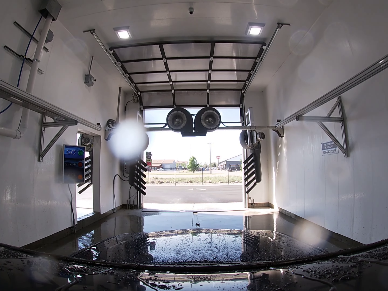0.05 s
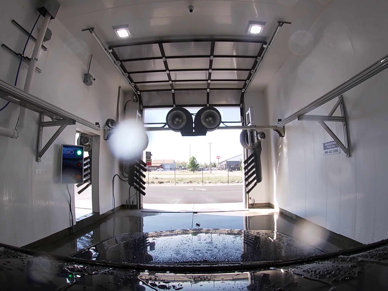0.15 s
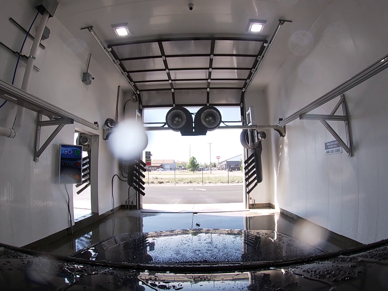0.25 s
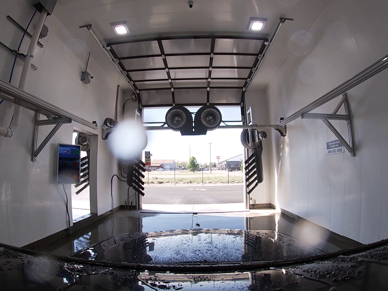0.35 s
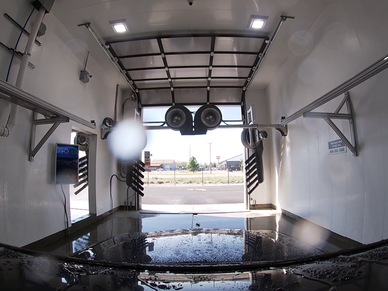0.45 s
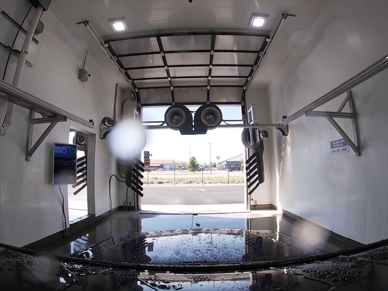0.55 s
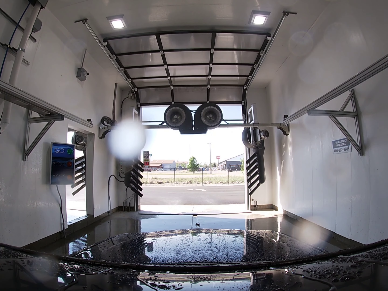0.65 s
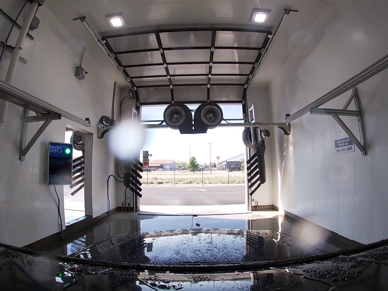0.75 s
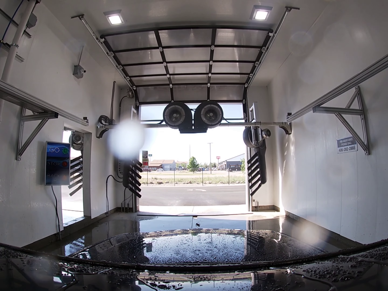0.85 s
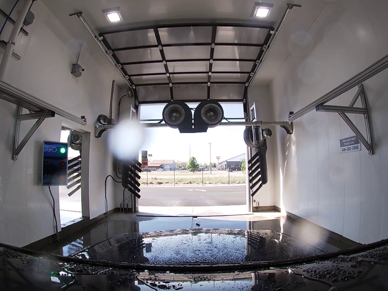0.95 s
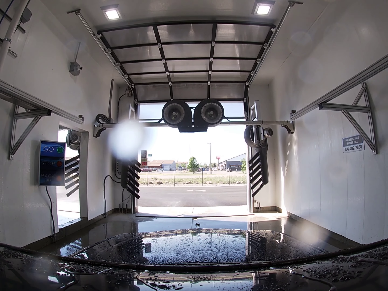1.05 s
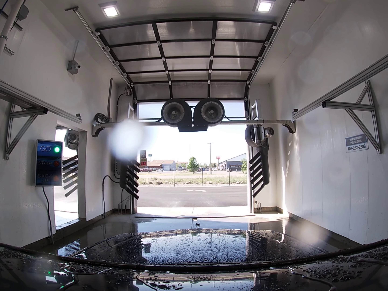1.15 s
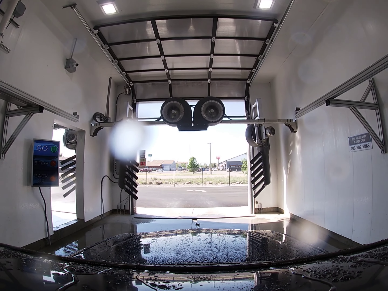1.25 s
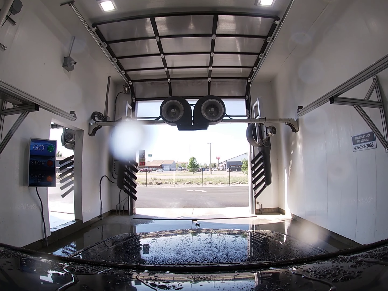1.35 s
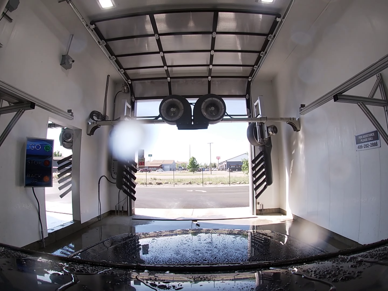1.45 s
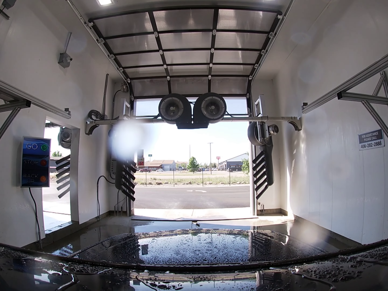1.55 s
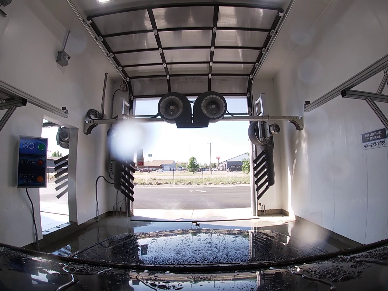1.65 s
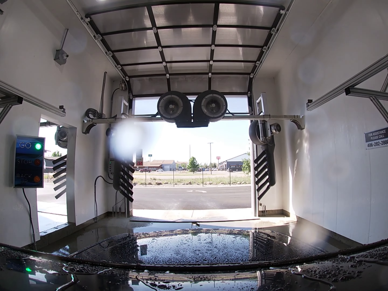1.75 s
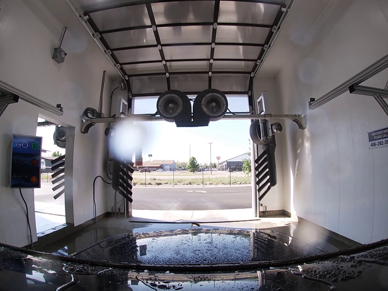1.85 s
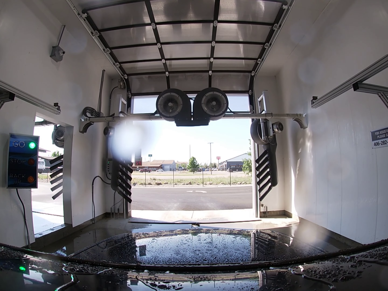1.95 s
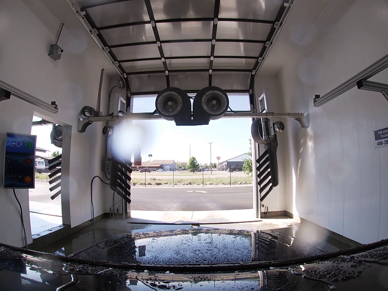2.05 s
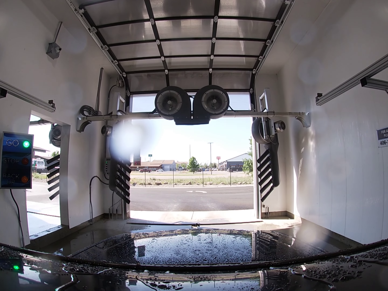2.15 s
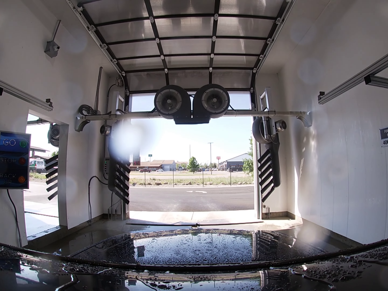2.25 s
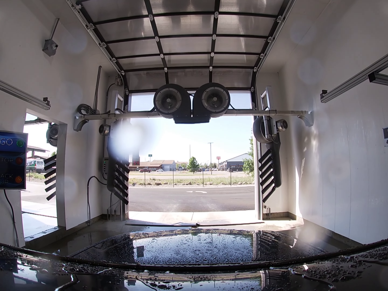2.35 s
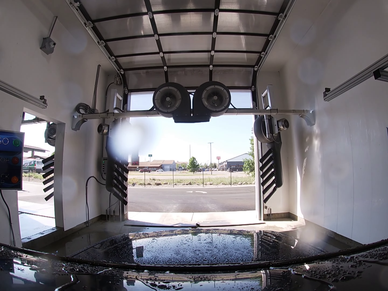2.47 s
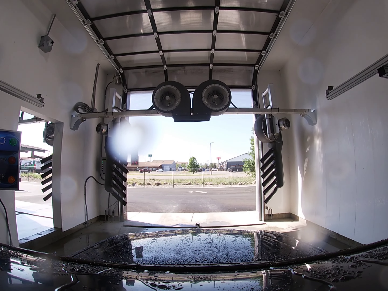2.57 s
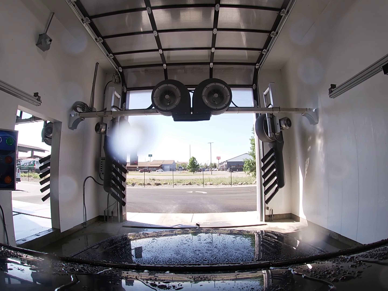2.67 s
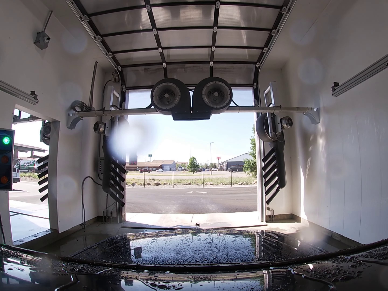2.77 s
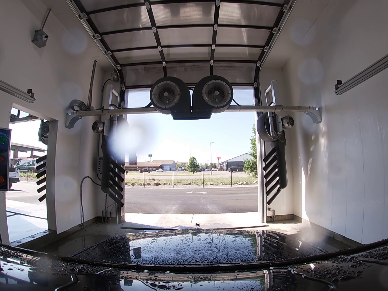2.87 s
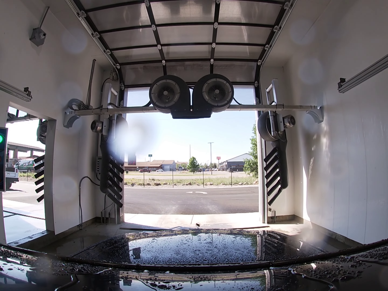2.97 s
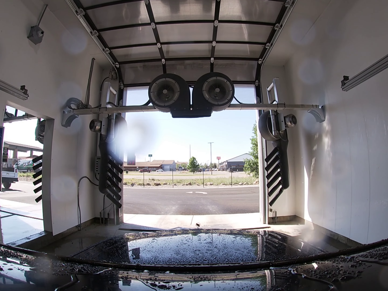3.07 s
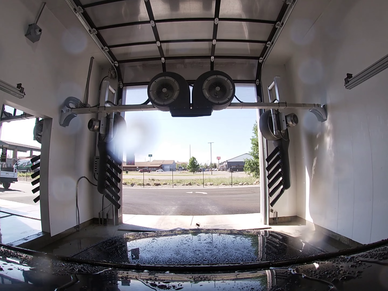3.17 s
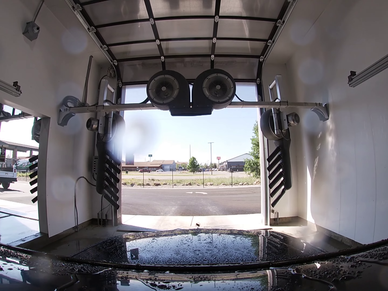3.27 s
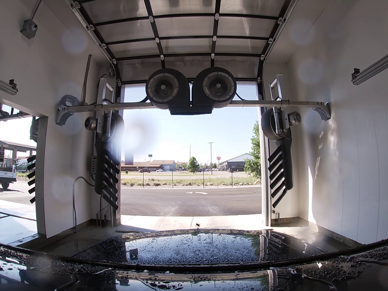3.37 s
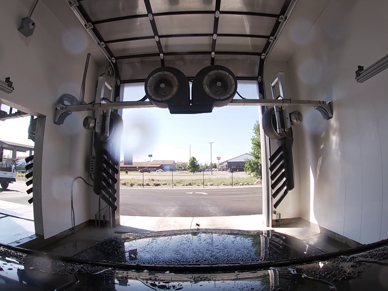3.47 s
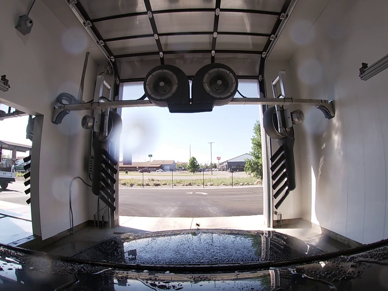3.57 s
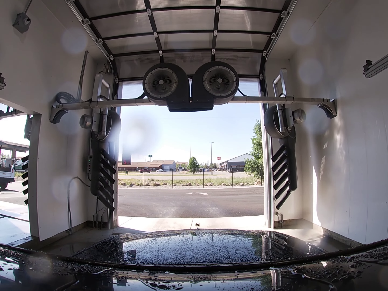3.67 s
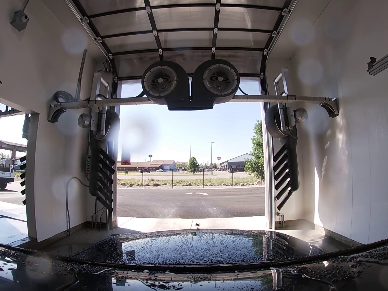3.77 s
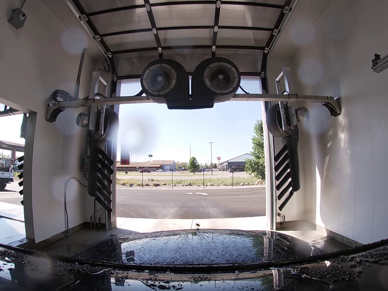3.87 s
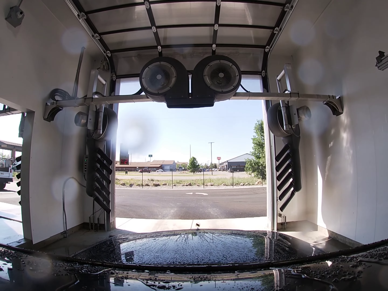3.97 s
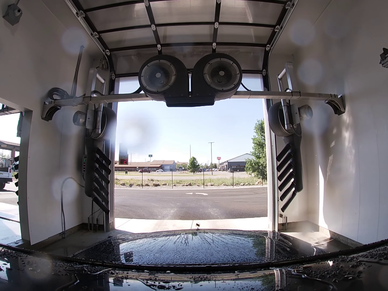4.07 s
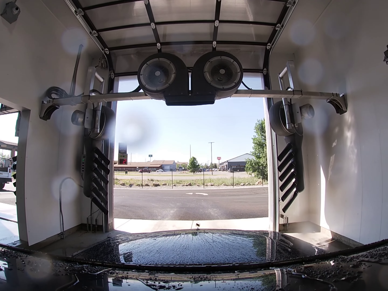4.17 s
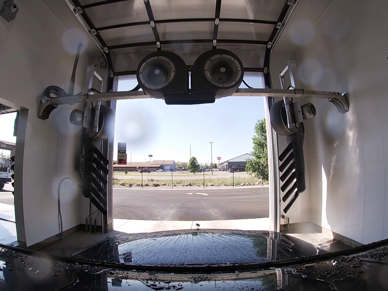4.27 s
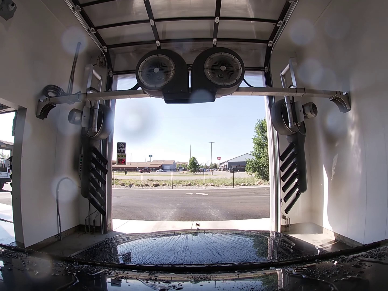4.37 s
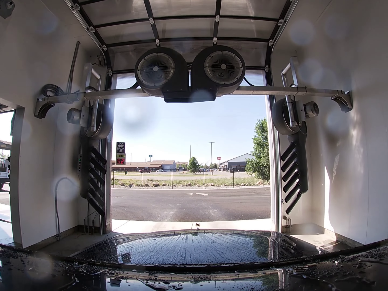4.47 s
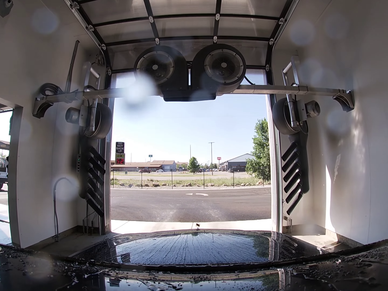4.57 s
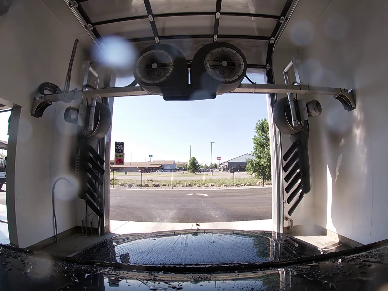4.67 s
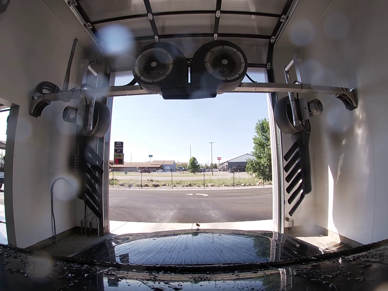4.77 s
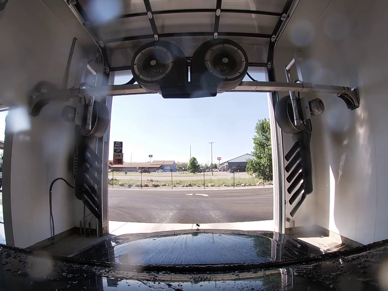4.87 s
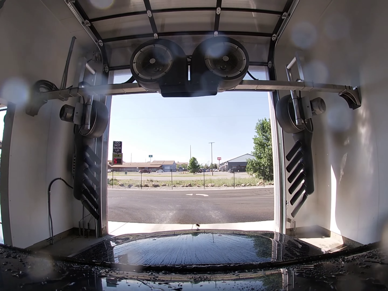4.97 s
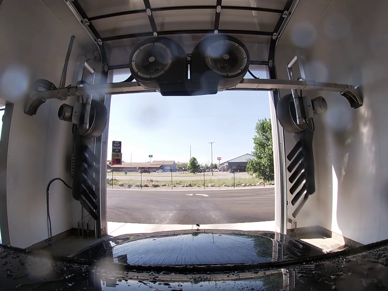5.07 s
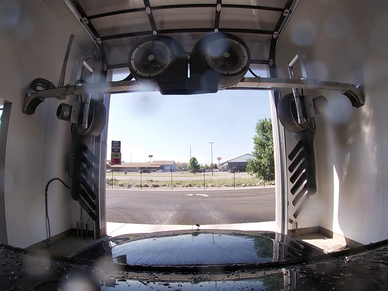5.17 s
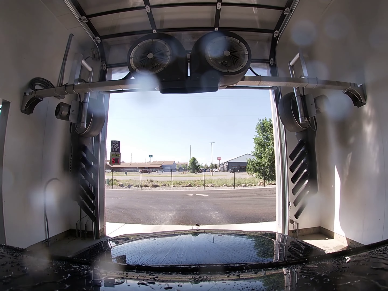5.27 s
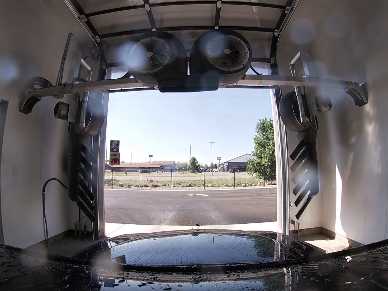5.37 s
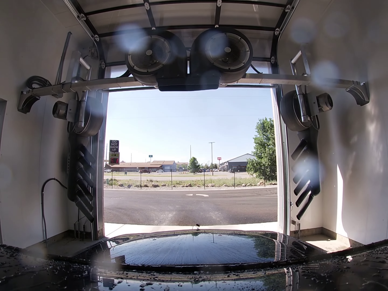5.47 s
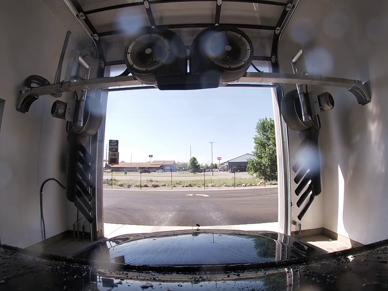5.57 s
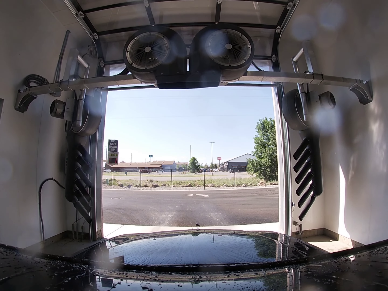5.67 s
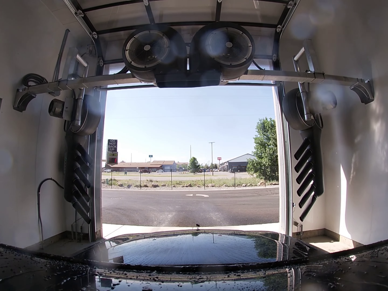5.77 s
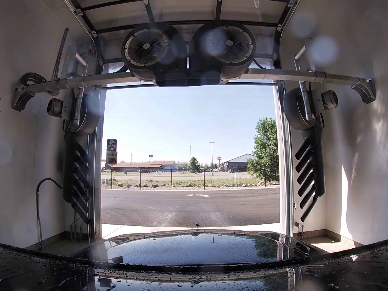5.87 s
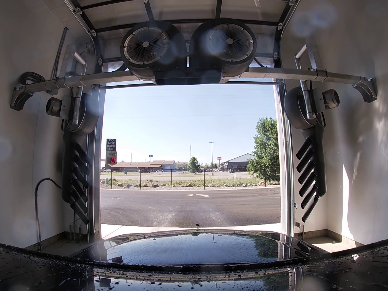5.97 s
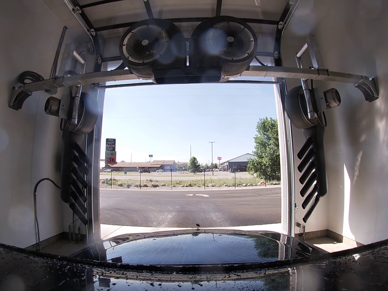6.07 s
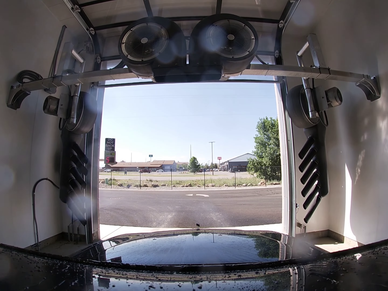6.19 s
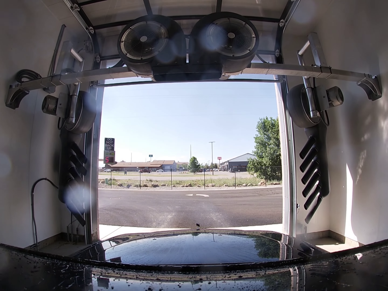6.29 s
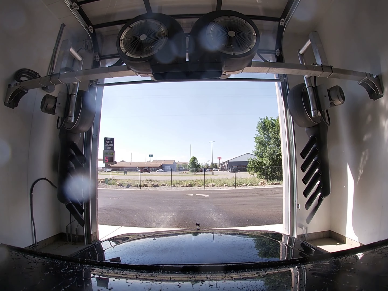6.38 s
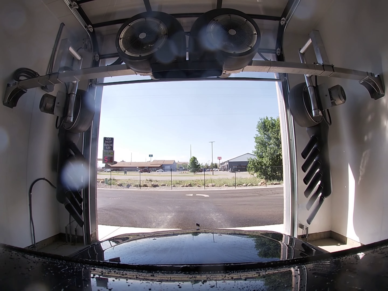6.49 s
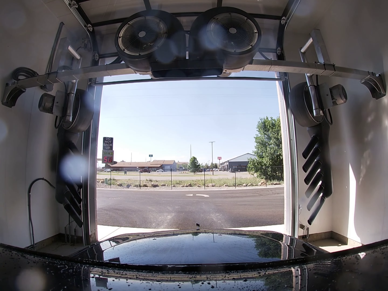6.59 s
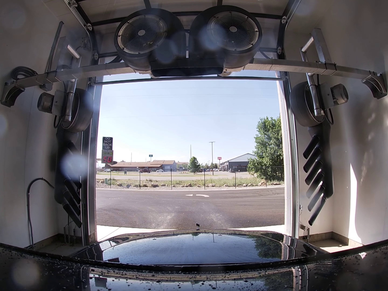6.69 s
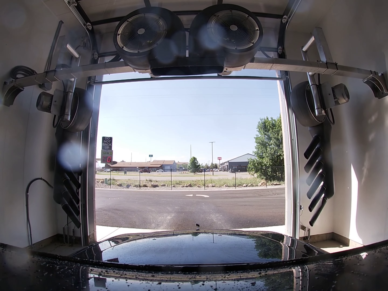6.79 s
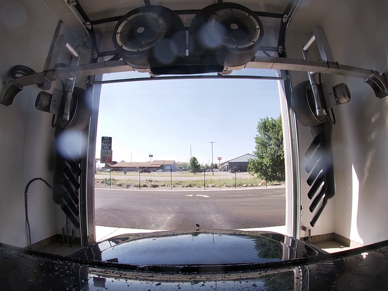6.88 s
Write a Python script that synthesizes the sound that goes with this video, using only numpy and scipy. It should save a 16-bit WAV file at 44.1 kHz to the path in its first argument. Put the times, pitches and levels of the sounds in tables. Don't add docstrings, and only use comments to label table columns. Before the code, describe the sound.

Inside a slowly rolling car, large blower dryers roar steadily while deep cabin booms and buffeting grow, then gusts, hisses and water ticks sweep the windscreen.

```python
import sys
import numpy as np
from scipy import signal
from scipy.fft import rfft, irfft, next_fast_len
from scipy.io import wavfile
from scipy.ndimage import uniform_filter1d

SR = 44100
rng = np.random.default_rng(int(sys.argv[2]) if len(sys.argv) > 2 else 0)


def master_out(mix):
    frames = np.transpose(np.atleast_2d(mix))
    ceiling = np.clip(frames, -1, 1)
    pcm = np.round(ceiling * 32767).astype(np.int16)
    wavfile.write(sys.argv[1], SR, pcm)


def ratio(d):
    e = np.asarray(d, float) / 20
    return 10 ** e


N = 305613
T = np.arange(N) / SR

# time_s, share (0-1)
JET = [
    (0, 0.58),
    (4.4, 0),
    (5.2, 0),
    (6, 0.7),
    (6.93, 0.95),
]


def tracks(table):
    s, *columns = np.transpose(table)
    return [np.interp(T, s, c) for c in columns]


def unit(x):
    return x / np.sqrt(np.mean(x ** 2))


def walk(rate):
    hold = int(SR / rate)
    steps = np.repeat(rng.standard_normal(N // hold + 1), hold)
    slewed = uniform_filter1d(uniform_filter1d(steps, hold), hold)
    return unit(slewed[:N])


def noise_spectrum(gain):
    size = next_fast_len(N)
    hz = np.arange(size // 2 + 1) * SR / size + 1e-3
    return rfft(rng.standard_normal(size)) * gain(hz), hz, size


def shaped(gain):
    spectrum, _, size = noise_spectrum(gain)
    return unit(irfft(spectrum, size)[:N])


def tone(hz, wander_hz, rate):
    return np.sqrt(2) * np.sin(2 * np.pi * np.cumsum(hz + wander_hz * walk(rate)) / SR)


def swells(s, db, half_s, rest_db, order=2):
    coarse = T[::32]
    distance = (coarse - np.reshape(s, (-1, 1))) / np.reshape(half_s, (-1, 1))
    bells = np.exp(-np.abs(distance) ** order)
    power = ratio(rest_db) ** 2 + ratio(db) ** 2 @ bells
    return np.interp(T, coarse, np.sqrt(power))


def lift_db(hz, modes):
    return sum(db / (1 + (2 * (hz - f) / w) ** 2) for f, w, db in modes)


def colour_db(hz):
    # pitch_hz, density_db (per Hz)
    colour = [(50, -32.5), (90, 0.5), (190, 1), (290, -2), (444, -5), (637, -10.5), (1110, -12.5),
              (1580, -7), (2510, -28), (4400, -34.5), (6800, -46), (9500, -54), (10200, -64.5),
              (14500, -72.5)]
    # pitch_hz, width_hz, lift_db
    case = [(1690, 680, 5.5), (2920, 740, 5), (3768, 614, 11), (5560, 1270, 6), (7900, 650, 2.5),
            (10900, 500, 7), (12400, 1210, 9)]
    # pitch_hz, width_hz, lift_db
    bay = [(252.5, 27, 5), (292.3, 14, 5), (398, 2.9, -7), (799, 9.5, 5.5), (1260, 130, -2),
           (1454, 62, 2.5), (1734, 62, -1.5), (2734, 250, -4.5)]
    f, db = np.transpose(colour)
    return np.interp(np.log(hz), np.log(f), db) + lift_db(hz, case) + lift_db(hz, bay)


def idle():
    # time_s, pitch_hz, level_db
    firing = [
        (0, 37.48, -33),
        (1, 37.6, -30),
        (2, 37.4, -38.5),
        (3.4, 36.7, -48.5),
        (6.93, 36.7, -48),
    ]
    hz, db = tracks(firing)
    octave = tone(2 * hz, wander_hz=0.45, rate=1.9)
    return ratio(db) * (tone(hz, wander_hz=0.39, rate=1.5) + ratio(-11.0) * octave)


def roof():
    # time_s, peak_db
    knocks = [(3.3, -30), (3.45, -26), (4.45, -34), (5.0, -24.5), (5.44, -24.5), (5.95, -20.5), (6.1, -31),
              (6.3, -25), (6.55, -31.5), (5.25, -26), (5.65, -29), (5.8, -30), (6.8, -33)]
    skin = shaped(lambda f: 1 / (1 + ((f - 125) / 40) ** 4))
    return swells(*np.transpose(knocks), half_s=0.046, rest_db=-51) * skin


def buffeting():
    from_s, rise_s = 3.6, .03
    calm_db, hit_db, grows_db_s = -41, -25.5, 1.43
    hit = .5 + .5 * np.tanh((T - from_s) / rise_s)
    db = calm_db + hit * (hit_db - calm_db + grows_db_s * (T - from_s)) + 1.3 * walk(8)
    body = shaped(lambda f: (f / 18) ** 2 / (1 + (f / 18) ** 2) / (1 + (f / 45) ** 1.93) / (1 + (f / 200) ** 4))
    return ratio(db + 5.5) * body


def cabin():
    # time_s, pitch_hz, peak_db, half_length_s
    surges = [(0.053, 52.7, -19, 0.15), (0.539, 57.63, -23, 0.15), (0.762, 55.1, -22, 0.088),
              (0.881, 51.2, -15.5, 0.034), (1.307, 52.03, -20, 0.053), (1.536, 61.8, -25, 0.056),
              (1.77, 59, -20.5, 0.051), (1.951, 55.1, -19, 0.12), (2.2, 60.2, -16, 0.03),
              (2.343, 56.1, -17, 0.079), (2.549, 54.64, -16.5, 0.024), (2.666, 58.7, -16.5, 0.03),
              (2.936, 52.8, -17, 0.15), (3.269, 56.8, -14.5, 0.091), (3.617, 56.54, -17, 0.085),
              (3.759, 53.05, -17, 0.017), (3.879, 50, -17, 0.073), (4.002, 51.86, -21.5, .06),
              (4.233, 53.5, -12, 0.11), (4.505, 51.24, -11, 0.063), (4.705, 54.06, -14.5, 0.17),
              (5.034, 54.96, -15, 0.24), (5.341, 46.54, -13, 0.077), (5.556, 49.2, -14.5, 0.043),
              (5.76, 52.2, -10, 0.1), (6.102, 55.16, -9.5, 0.086), (6.338, 59.07, -12, 0.021),
              (6.455, 55, -3.5, 0.046), (6.716, 53.1, -11, 0.15), (6.93, 46.4, -6.5, 0.13)]
    # time_s, peak_db
    thumps = [(.15, -21), (.46, -24.5), (1.92, -21), (2.48, -16.5), (3.1, -24.5), (3.45, -15.5),
              (3.7, -15.5), (3.97, -18.5), (4.42, -23), (5.18, -19), (5.4, -16), (5.98, -22), (6.2, -23)]
    s, hz, db, half_s = np.transpose(surges)
    loose_share = .25
    sung = tone(np.interp(T, s, hz), wander_hz=1.174, rate=14)
    loose = shaped(lambda f: 1 / (1 + ((f - 54) / 9) ** 4))
    air = np.sqrt(1 - loose_share) * sung + np.sqrt(loose_share) * loose
    boom = swells(s, db, half_s, rest_db=-27, order=4) * air
    panel = shaped(lambda f: 1 / (1 + ((f - 72) / 8) ** 4))
    thumping = swells(*np.transpose(thumps), half_s=0.052, rest_db=-25.5) * panel
    return boom + ratio(-3.5) * thumping + buffeting()


def held(x, top_db, knee):
    swell = uniform_filter1d(np.abs(signal.hilbert(x, next_fast_len(N))[:N]), int(0.01 * SR))
    return x / (1 + (swell / ratio(top_db)) ** knee) ** (1 / knee)


def blades():
    # up_to_speed_s, spin_up_hz_per_s, blade_tone_hz, sags_from_s, sag_hz_per_s
    blowers = [
        (1.16, 135, 528, 5.5, 7.1),
        (2.7, 135, 530, 5.0, 75),
        (1.2, 20, 410, 1.4, 9),
    ]
    # time_s, peak_db, half_length_s
    sings = [
        [(.8, -26, 0.13), (.97, -31, .08), (1.18, -31, 0.07), (1.5, -36, .1), (1.9, -41, 0.36),
         (3.25, -28, 0.14), (3.5, -34.5, 0.079), (3.98, -30.5, 0.11), (4.2, -31, 0.082), (4.5, -32.5, 0.1),
         (4.75, -33.5, 0.12), (5.0, -31.5, .1)],
        [(2.33, -32, .13), (2.6, -31, 0.096), (2.9, -33, .12), (5.3, -34, .08), (5.5, -29.5, 0.17),
         (5.8, -31, 0.16)],
        [(1.35, -29, 0.068), (2.1, -28.5, 0.081), (2.6, -34.5, 0.21), (3.17, -26.5, 0.079), (5.3, -32.5, 0.13)],
    ]
    sag_limits_hz = [24, 77, 19]
    knee_s = 0.0803

    def after(s):
        return knee_s * np.logaddexp(0, s / knee_s)

    out = 0
    jet_masks = ratio(-9 * tracks(JET)[0] ** 4)
    for blower, limit_hz, moments in zip(blowers, sag_limits_hz, sings):
        ready_s, spin_up, top_hz, sag_s, sag = blower
        hz = top_hz - spin_up * after(ready_s - T) - np.minimum(sag * after(T - sag_s), limit_hz)
        speed = np.clip(hz / top_hz, 0, 1)
        level = swells(*np.transpose(moments), rest_db=-42.5) * speed ** 4 * jet_masks
        echoes = .55 + .45 * (walk(45) + 1j * walk(45))
        turning = np.exp(2j * np.pi * np.cumsum(hz + 4 * walk(20)) / SR)
        out = out + level * np.sqrt(2) * np.real(echoes * turning)
    return out


def drops():
    # time_s, peak_db
    ticks = [(4.9647, -43), (5.1795, -43), (5.461, -44), (5.671, -38), (5.871, -38), (6.177, -48),
             (6.417, -48), (5.4786, -47), (5.5253, -48), (5.552, -46), (5.586, -48), (5.923, -46),
             (5.9504, -46), (6.1405, -48), (6.2597, -47), (6.3205, -48), (6.3421, -49), (6.3775, -48),
             (6.4703, -49), (6.557, -48), (6.6997, -49), (6.8479, -47)]
    envelope = sum(ratio(db - 11.5) * np.exp(-((T - s - .001) / 0.0013) ** 2) for s, db in ticks)
    return envelope * shaped(lambda f: 1 / (1 + ((f - 7200) / 3300) ** 6))


def spatter():
    droplets_per_s, size_db, droplet_s = 250, 6.5, 0.00073
    chance = rng.random((2, N))
    sizes = ratio(-size_db * np.log(chance[1] + .08)) ** 2
    hits = (chance[0] < droplets_per_s / SR) * sizes
    grain = np.convolve(hits, np.hanning(int(4 * droplet_s * SR)), "same")
    return .65 + .35 * grain / grain.mean()


def splashes():
    # time_s, peak_db, centre_hz, length_ms
    bursts = [(5.254, -39, 4670, 9.3), (5.268, -36, 4540, 9), (5.3124, -43, 5410, 9),
              (5.3393, -43, 4830, 7.8), (5.3767, -37, 4900, 9), (5.3962, -35, 4910, 9),
              (5.4117, -37, 5160, 7.9), (5.4616, -40, 5000, 9), (5.5509, -39, 5100, 9),
              (5.5858, -35, 4650, 8), (5.8662, -44, 5130, 9), (5.9045, -41, 4980, 9.9),
              (5.9514, -41, 4850, 9), (5.9784, -40, 4730, 9), (6.0217, -38, 4850, 9),
              (6.0542, -39, 4740, 8.3), (6.0961, -41, 4500, 8.1), (6.132, -39, 4560, 8.3),
              (6.1789, -37, 4660, 7.3), (6.2069, -37, 4760, 9.8), (6.2473, -38, 4700, 9),
              (6.2908, -36, 4730, 9), (6.349, -44, 5150, 7.9), (6.382, -36, 4660, 9),
              (6.4483, -36, 4680, 9), (6.4748, -38, 5010, 8.2), (6.5276, -39, 4730, 9),
              (6.6349, -42.5, 4700, 9), (6.7017, -38, 4650, 7.9), (6.7446, -41, 5230, 9.2),
              (6.8394, -41.5, 4810, 7.7), (6.8843, -39, 5060, 7)]
    # time_s, peak_db, centre_hz, length_ms
    fine_bursts = [(4.9672, -47, 6000, 7), (5.1657, -53, 6020, 7), (5.1797, -45, 6020, 7),
                   (5.4152, -51, 6480, 7), (5.4606, -45, 6120, 7), (5.4785, -45, 6900, 7),
                   (5.5254, -45, 6310, 7), (5.5509, -52, 6080, 7), (5.6711, -50, 8150, 5),
                   (5.8543, -48, 6350, 7), (5.8637, -44, 6310, 7), (5.923, -47, 6000, 7),
                   (5.923, -41, 6120, 7), (5.9504, -41, 6210, 7), (5.9764, -43, 6520, 7),
                   (6.0208, -48, 6310, 7), (6.0597, -45, 6460, 7), (6.0996, -50, 6020, 7),
                   (6.1385, -49, 6000, 7), (6.1465, -44, 6590, 5.2), (6.1769, -40, 6010, 6.3),
                   (6.2059, -44, 6410, 7), (6.2468, -48, 6410, 7), (6.2597, -43, 6040, 7),
                   (6.3191, -49, 6400, 7), (6.3421, -48, 6510, 7), (6.3775, -45, 6000, 7),
                   (6.4169, -45, 6115, 7), (6.4523, -51, 6050, 7), (6.4703, -44, 6610, 7),
                   (6.5261, -51, 6200, 7), (6.5571, -47, 6700, 7), (6.5995, -46, 6140, 6.9),
                   (6.6345, -48, 6220, 7), (6.6997, -46, 6160, 7), (6.7441, -50, 6620, 6.9),
                   (6.786, -49.5, 6060, 7), (6.8319, -54, 6520, 7), (6.8479, -46, 6300, 7),
                   (6.8828, -49, 6030, 7)]
    glass_ring = .45
    hiss = shaped(lambda f: 1 / (1 + (f / 820) ** 4))
    grain = glass_ring + hiss * np.sqrt(spatter())
    out = np.zeros(N)
    for s, db, hz, ms in bursts + fine_bursts:
        near = slice(int((s - .005) * SR), int((s + .08) * SR))
        u = np.maximum(T[near] - s + .002, 0) / (ms * .001 + .001)
        envelope = ratio(db - 9) * np.e * u * np.exp(-u)
        out[near] += envelope * grain[near] * np.cos(2 * np.pi * hz * T[near])
    return out


def gust_gain(hz):
    # pitch_hz, lift_db
    tilt = [(900, -8), (1600, -12), (2600, -7), (3700, 13.5), (5000, 6.5), (6500, -4), (9000, 3),
            (13000, 0)]
    f, db = np.transpose(tilt)
    return ratio(colour_db(hz * 1.008) + np.interp(np.log(hz), np.log(f), db))


def gusts():
    # time_s, peak_db, rush_db (lower rush, relative), length_ms
    strong = [(4.9482, -33, 0, 27), (5.1127, -31, 8, 18), (5.222, -27, -8, 12), (5.247, -28, 3.5, 36),
              (5.3113, -22, -3, 13), (5.34, -33, -13, 13), (5.397, -25, -1, 20), (5.456, -25, -16, 18),
              (5.4786, -23.5, -7, 20), (5.5324, -23, -4, 27), (5.5594, -32, -4, 33), (5.586, -29, -8, 14),
              (5.645, -32, -4, 14.8), (5.67, -22, 0, 29), (5.7008, -27.5, -4, 42.4), (5.7405, -24.5, 5, 29),
              (5.782, -20.5, -1, 25.5), (5.8596, -23, -18, 15), (5.905, -29.5, -10, 27.5),
              (5.947, -28.5, 4, 24), (5.9775, -33, 9.5, 34), (6.021, -28.5, 4, 14.7), (6.096, -30, -6, 12),
              (6.291, -30, 5, 15.7), (6.0536, -27, -8, 23), (6.134, -31, 6.5, 19), (6.1755, -24.5, 8, 8.1),
              (6.186, -24.5, 9, 7.1), (6.341, -29, 6, 11), (6.272, -30, 7, 12), (6.305, -31, 7, 10),
              (6.2094, -26.5, 3, 25), (6.25, -29, 7, 21), (6.3195, -31, 8, 23), (6.3792, -25, 2, 18),
              (6.417, -25, 4.5, 7.5), (6.4594, -30, 3.5, 31), (6.5, -31, 5, 13), (6.541, -30.5, 7, 26),
              (6.6328, -34.5, 8.5, 30), (6.702, -35, -13, 18), (6.7446, -39, 2, 15),
              (6.8454, -31.5, 5.5, 32), (6.884, -31, 5, 12)]
    puffs = [(5.2 + .043 * (k + 0.3 * a), -34 + 1.1 * b, 3 + 4 * c, 16)
             for k, (a, b, c) in enumerate(rng.standard_normal((40, 3)))]
    widths = np.array([[0.5], [0.48], [0.36]])
    power = np.zeros((3, N))
    for s, db, rush_db, ms in strong + puffs:
        sizzle_db = -7 + 5 * (s - 5.5)
        near = slice(int((s - .05) * SR), int((s + .1) * SR))
        u = (T[near] - s) / (ms * 0.00089 + 0.00058) - .45
        peaks = ratio(db + np.array([[rush_db], [0], [sizzle_db]]))
        power[:, near] += np.exp(-(u / widths) ** 2) * peaks ** 2
    rush = shaped(lambda f: gust_gain(f) * (f / 900) ** 4 / (1 + (f / 900) ** 4) / (1 + (f / 2500) ** 12))
    hiss = shaped(lambda f: gust_gain(f) / (1 + (2500 / f) ** 12) / (1 + (f / 4400) ** 12))
    sizzle = shaped(lambda f: gust_gain(f) / (1 + (4400 / f) ** 12) / (1 + (f / 9000) ** 12))
    air = [ratio(-4.0) * rush, ratio(-12.5) * hiss, ratio(-16.0) * sizzle * np.sqrt(spatter())]
    patches = ratio(np.array([walk(30), walk(30), walk(30)]))
    return np.sum(np.sqrt(power) * patches * air, axis=0)


def roar():
    # time_s, strength_db
    strength = [(0, -3.5), (.35, -3), (.7, 0), (1.1, 2.5), (1.45, 2.5), (1.8, 2), (2.0, 1), (2.2, 1.5),
                (2.7, 3), (3.0, 1.5), (3.4, 1), (4.1, -1.5), (4.9, -5), (5.6, -2), (5.95, -4.5),
                (6.3, -3.5), (6.93, -6.5)]
    anchors_hz = [250, 550, 1500, 4500, 11500]
    follows = [1, 0.87, 0.98, 0.8, 0.45]
    shade_db = [1.5, -4.5, -2, -1, -2.5]
    # time_s, lift_db
    heaves = [
        (0.449, 4),
        (0.871, 2),
        (1.75, 1.5),
        (2.999, 2),
        (6.2, 4.5),
    ]
    jet = tracks(JET)[0]
    levels = np.outer(follows, tracks(strength)[0]) + np.outer(shade_db, jet)
    levels[0] += sum(db * np.exp(-((T - s) / 0.11) ** 2) for s, db in heaves)
    air, hz, size = noise_spectrum(lambda f: ratio(colour_db(f)))
    octave, shared, flutter = np.log2(hz), walk(12), walk(45)
    out = 0
    for centre in np.arange(6, 14.5, .5):
        window = np.cos(np.pi / 2 * np.clip(2 * (octave - centre), -1, 1)) ** 2
        place = np.interp(centre, np.log2(anchors_hz), np.arange(len(anchors_hz)))
        k = min(int(place), len(anchors_hz) - 2)
        db = levels[k] + (place - k) * (levels[k + 1] - levels[k])
        muffle_db = 2 * (centre == 12.5) + 3 * (centre > 13.2) + 4 * (centre > 13.7)
        db = db + jet * (2 * flutter * (centre > 10) - muffle_db)
        out = out + irfft(air * window, size)[:N] * ratio(db + 0.3 * shared + 0.34 * walk(7.1))
    return unit(out) * ratio(-20.5)


def scene():
    low = idle() + roof() + held(cabin(), top_db=-8.5, knee=5.4)
    water = drops() + splashes()
    return (low + blades() + water + gusts() + roar())[None]


def top_cut(x):
    return signal.sosfilt(signal.butter(12, 15100, fs=SR, output="sos"), x)


def record(dry):
    ceiling = .62
    soft = dry / (1 + np.abs(dry / ceiling) ** 8) ** (1 / 8)
    return top_cut(soft)


dry = scene()
out = record(dry)
master_out(out)
```